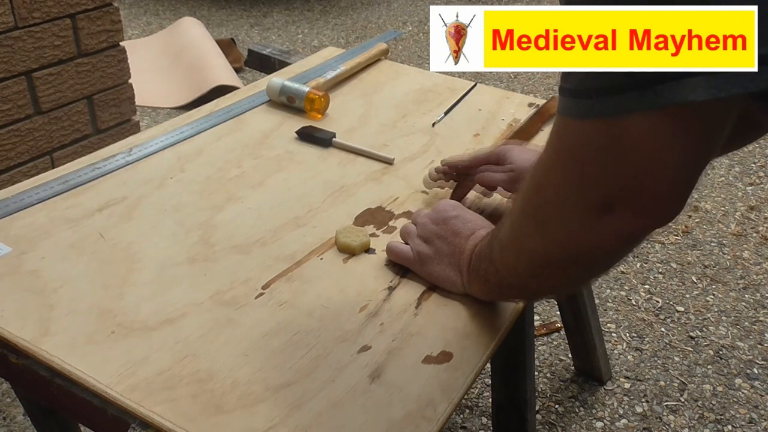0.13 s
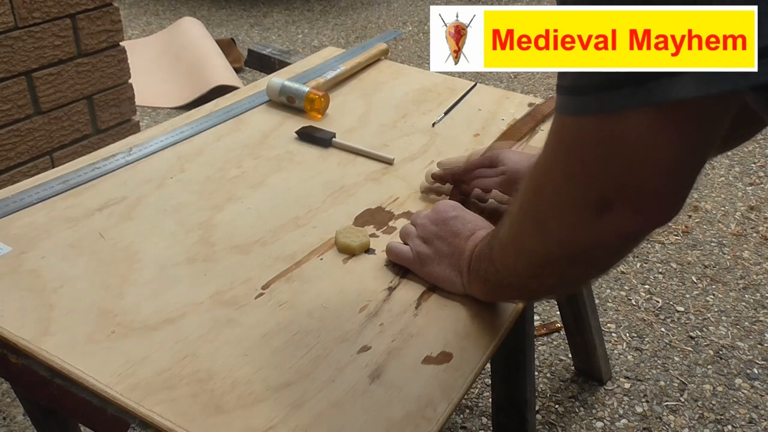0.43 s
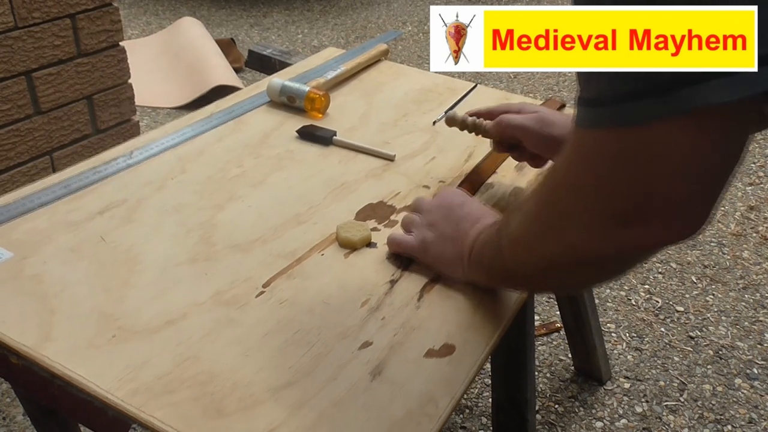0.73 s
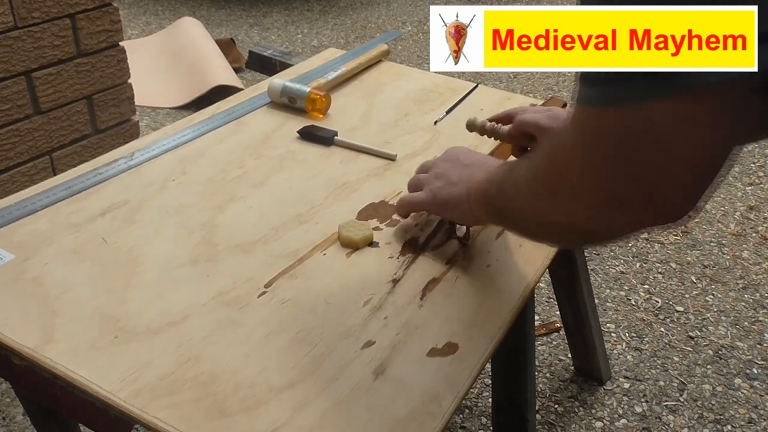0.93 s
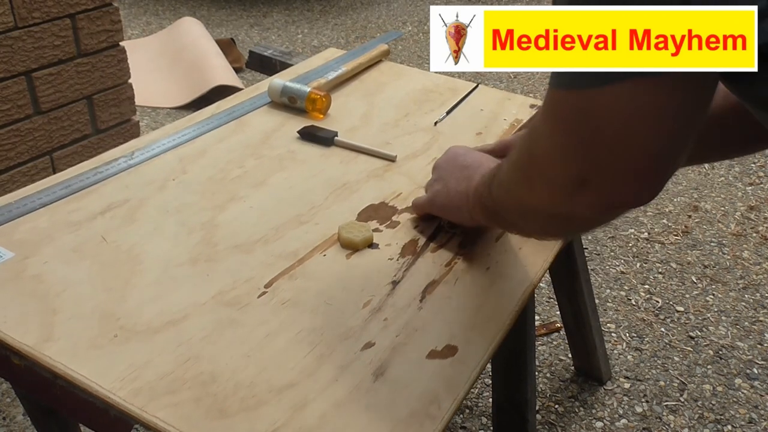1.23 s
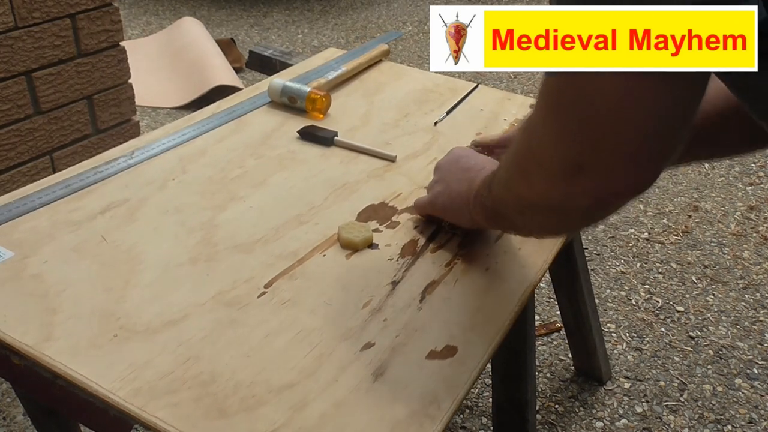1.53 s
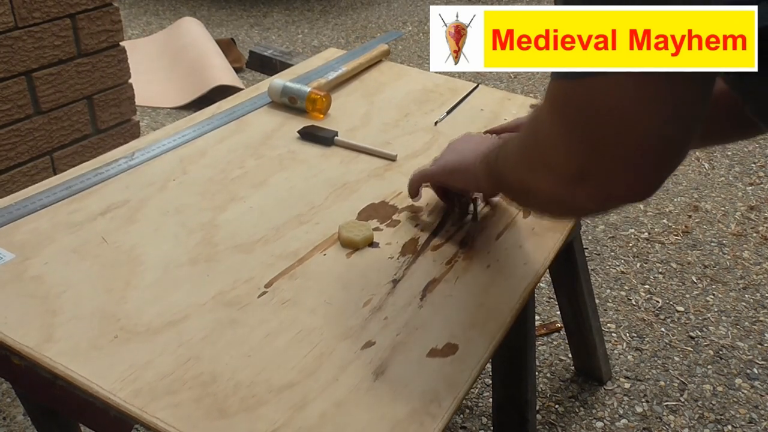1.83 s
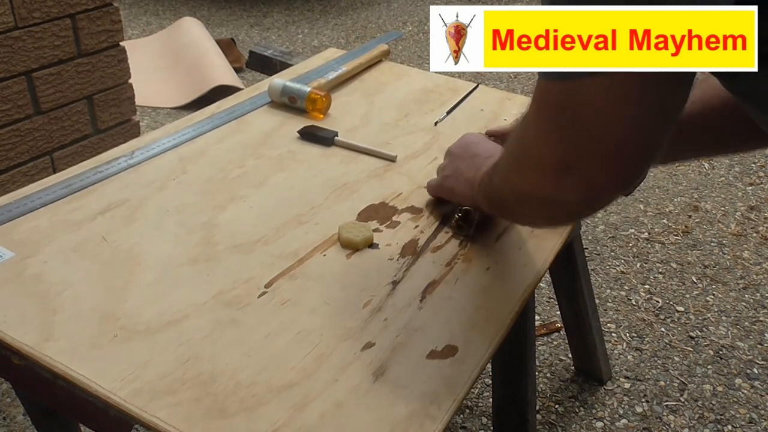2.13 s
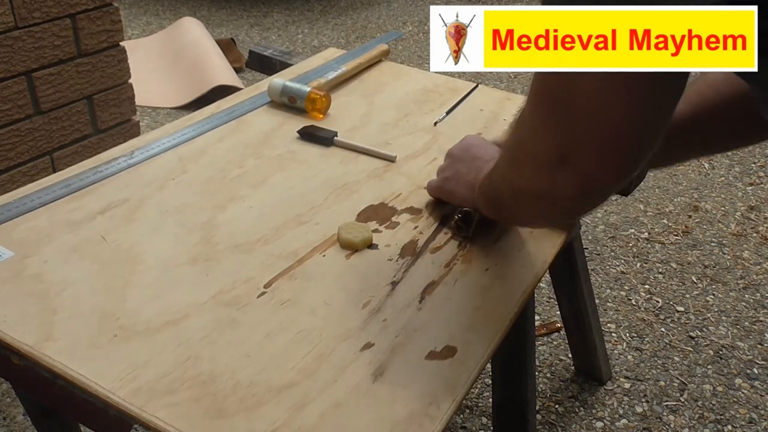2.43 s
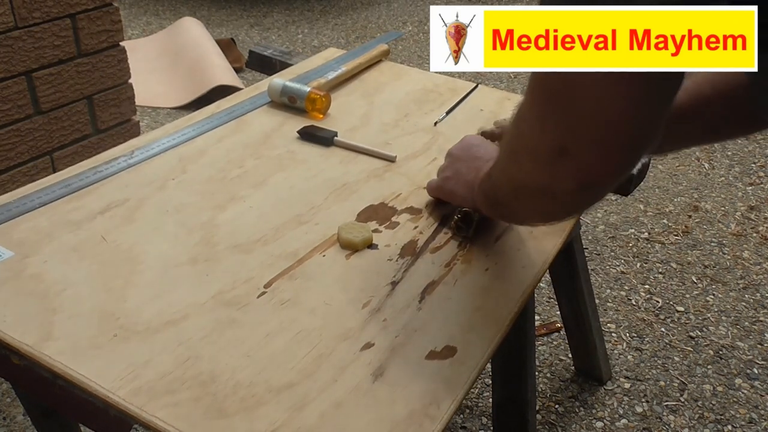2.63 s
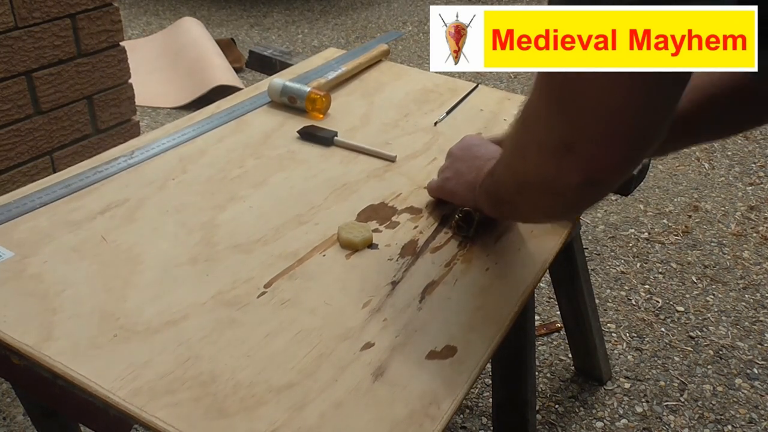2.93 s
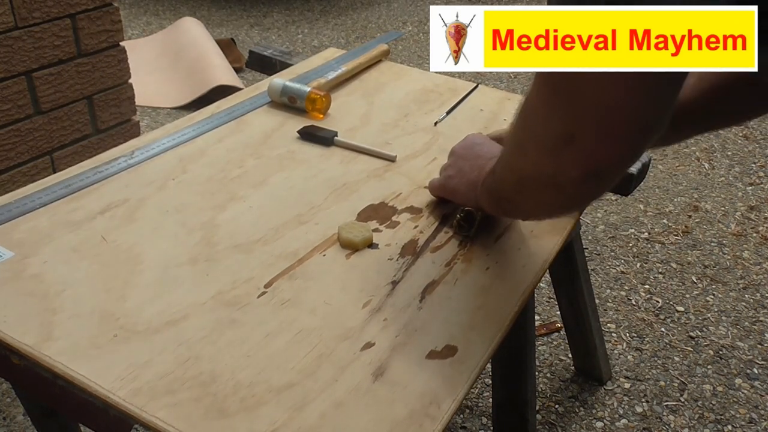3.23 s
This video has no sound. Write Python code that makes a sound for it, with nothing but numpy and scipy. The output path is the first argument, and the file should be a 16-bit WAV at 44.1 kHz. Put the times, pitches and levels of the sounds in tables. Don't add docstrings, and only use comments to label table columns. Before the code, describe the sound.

Hissing, shuddering rubs of wood on leather over a plywood bench, knocks and one loud crack

```python
import sys
import numpy as np
from scipy import signal
from scipy.io import wavfile
from scipy.ndimage import uniform_filter1d

SR = 44100
rng = np.random.default_rng(int(sys.argv[2]) if len(sys.argv) > 2 else 0)


def digitize_waveform(pressure):
    field = np.atleast_2d(pressure).T
    bounded = np.clip(field, -1, 1)
    quanta = np.round(bounded * 32767).astype(np.int16)
    wavfile.write(sys.argv[1], SR, quanta)


def ratio(d):
    e = np.asarray(d, float) / 20
    return 10 ** e


N = 149940

# frequency in Hz, level in dB.
AIR_HZ_DB = [(30, -28), (130, 1), (470, -6), (1500, -18.5), (3000, -32.5), (5000, -27.5), (11000, -31.5),
             (13500, -32.5), (16000, -61)]
INSECT_HZ_DB = [(7000, -32), (7600, -12.5), (9050, -0.5), (10000, -10.5), (10900, -32.5)]
AIR_DB, INSECT_DB, INSECT_CLICKS_PER_S = -36.5, -38.5, 4000

# time in seconds, peak in dB.
PIPS = [
    (0.953, -31),
    (1.024, -35),
    (1.1, -32),
    (1.172, -22.5),
    (1.287, -28),
    (1.382, -29),
    (1.524, -24),
]
PIP_HZ, PIP_S, PIP_DB = 862, .026, 1.5

# frequency in Hz, T60 in seconds.
YARD_T60_S = [(300, 0.16), (8000, 0.14)]
YARD_DB = -10

# frequency in Hz, left minus right in dB.
LEAN_HZ_DB = [(100, -1.7), (500, -0.5), (2000, 2), (6000, -0.5)]
BASS_CUT_HZ_DB = [(25, -74), (80, 4), (150, 1.5)]

RATTLE_HZ_DB = [(300, -4), (600, 3), (2200, -6), (2900, -28), (6000, -42)]
RATTLE_START_S, RATTLE_DB, RATTLE_T60_S = 2.045, -26, 0.14

# delay in seconds, level in dB.
CRACK_BOUNCES = [
    (.005, 1.5),
    (0.0229, -8.5),
    (.031, -18),
    (.047, -14.5),
]
# frequency in Hz, level in dB, T60 in seconds.
CRACK_MODES = [(34, -17, 0.063), (205, -13.5, 0.13), (360.4, -1.5, 0.091), (480, -4.5, 0.075),
               (640, 5.5, 0.054), (810, -8, 0.017), (1105, -1, 0.029), (1300, 1, 0.013),
               (1680, -4.5, 0.045)]
SNAP_HZ_DB = [(30, -12), (204, -15), (684, -3), (2100, -6), (3300, -15.5), (9710, -21), (16000, -32)]
# frequency in Hz, T60 in seconds.
SNAP_T60_S = [(100, 0.099), (1000, 0.14), (3000, 0.053), (6000, 0.073), (12000, 0.0071)]
CRACK_S, CRACK_DB, SNAP_DB = 2.0128, 2, 0

BENCH_MODES = [(159, -7.5, 0.14), (210.7, -6.5, 0.16), (252.6, 3.5, 0.098), (311.7, -1, 0.12),
               (396.6, -4, 0.12), (450.3, -1, 0.13), (539, -5.5, 0.039), (610.3, 2, 0.066),
               (658, -10.5, 0.079), (1050, -17, 0.28)]
TOOL_MODES = [(620, -3, .04), (1050, -2, .04), (1340, 0, .04), (1900, -4, .035)]
# time in seconds, peak in dB, hardness 0 to 1.
KNOCKS = [
    (0.47, -16.5, 0.27),
    (0.674, -18, 1),
    (0.754, -21, 0.24),
    (0.854, -18.5, 0.17),
    (1.126, -20.5, 0.43),
    (1.22, -19.5, 0.42),
    (1.597, -20, 0.6),
    (1.904, -14, 0.24),
]
# time in seconds, peak in dB, pitch in Hz.
TICKS = [
    (.7945, -33, 3500),
    (.8325, -29, 4150),
    (1.1423, -27, 2600),
    (1.8125, -35, 3500),
    (1.9036, -21, 3600),
    (2.2548, -18.5, 5500),
    (2.3436, -21, 7300),
    (2.345, -24, 3600),
]

# start in seconds, length in seconds, level in dB, peak as share of length.
SKID = (.5525, .085, -22, .1)
SKID_HZ_DB = [(120, -44), (200, -10), (456, -2.5), (791, -13), (1160, -8), (2130, -24), (2380, -31),
              (5730, -18), (16000, -59)]
# frequency in Hz, width in Hz, level in dB.
SKID_RINGS = [(1240, 400, 0), (1920, 120, -4)]
# start in seconds, length in seconds, level in dB, pitch in Hz, width in Hz.
SQUEAKS = [(.909, .014, -43, 13300, 900), (.92, .022, -49, 12800, 500), (.911, .012, -45, 11600, 700),
           (.91, .03, -51, 15300, 500), (.909, .03, -43, 6300, 500), (.909, .02, -43, 4700, 700),
           (.95, .024, -39, 6150, 250), (.954, .012, -41, 11500, 600), (.956, .008, -45, 12800, 800),
           (.955, .03, -51, 15200, 700), (.974, .018, -38, 4600, 1500), (1.0, .012, -42, 3900, 900)]

# time in seconds, peak in dB, pitch in Hz.
JOLTS = [(0.149, -21.5, 483), (0.286, -18.5, 400), (0.468, -15.5, 583), (0.499, -19, 378),
         (0.521, -19, 363), (0.553, -15, 1384), (0.673, -16.5, 1320), (0.856, -11.5, 628),
         (0.903, -15.5, 636), (1.128, -14, 598), (1.136, -14.5, 466), (1.171, -17, 870), (1.221, -8.5, 632),
         (1.466, -14.5, 554), (2.151, -15, 627), (2.441, -26, 470), (2.527, -16, 387), (2.649, -17, 280),
         (2.677, -9, 677), (2.729, -29, 450), (2.762, -24, 243), (2.889, -14, 533), (2.988, -10, 274),
         (3.019, -17, 274), (3.132, -7, 624), (3.154, -10, 307), (3.183, -7.5, 276), (3.257, -6.5, 313),
         (3.268, -5, 445), (3.287, -8, 264),
         (.034, -24, 1060), (.221, -25, 1040), (.443, -25, 1150), (.479, -14, 334), (.753, -18, 697),
           (.777, -21, 413), (1.174, -19, 1290), (1.226, -11.5, 560), (1.5973, -8.5, 304),
           (1.9054, -6.5, 401), (1.929, -11.5, 333), (2.99, -21, 994), (3.005, -18, 660)]
JOLT_RISE_S, JOLT_T60_S, JOLT_T60_CYCLES, JOLT_DB = 0.0017, 0.025, 9.4, -2.5

# start in seconds, length in seconds, level in dB.
DRONES = [
    (1.378, .12, -27),
    (1.655, .11, -23),
    (1.24, .035, -26),
    (2.515, .075, -24),
]
DRONE_HZ = 209

# start in seconds, length in seconds, hiss in dB,
# shudder in dB.
PUSHES = [
    (.035, 0.074, -41.5, -30.5),
    (.225, 0.1, -39, -27.5),
    (.465, 0.089, -39, -24.5),
    (1.375, 0.12, -36, -26),
    (1.645, 0.11, -37.5, -29.5),
    (2.39, 0.11, -34, -27),
    (2.605, 0.11, -34, -21.5),
    (2.84, 0.11, -33, -17.5),
    (3.09, 0.12, -34, -19),
    (3.35, 0.088, -34.5, -21.5),
]
# start in seconds, length in seconds, hiss in dB, shudder in dB.
PULLS = [(.125, 0.071, -37, -28), (.34, 0.097, -35.5, -28), (.655, 0.058, -40, -27),
         (1.12, 0.11, -36, -25.5), (1.215, 0.1, -46, -28), (1.515, 0.13, -33.5, -22.5),
         (2.275, 0.095, -35.5, -22.5), (2.5, 0.097, -33, -22), (2.73, 0.095, -32, -20),
         (2.97, 0.099, -32, -19), (3.225, 0.11, -32, -19)]
# start in seconds, length in seconds, hiss in dB, shudder in dB.
SHIFTS = [
    (-.05, 0.073, -44.5, -34),
    (.745, 0.04, -78, -28),
    (.795, 0.051, -42.5, -31),
    (.86, 0.062, -44.5, -29),
    (.9, 0.13, -38.5, -30.5),
    (1.0, 0.16, -52.5, -37.5),
    (1.92, 0.27, -45, -42),
    (2.05, 0.098, -63, -29),
    (2.13, 0.074, -67, -26),
]
HISS_HZ_DB = [(880, -5), (1500, 0), (2080, -1.5), (2690, -11.5), (4730, -2.5), (7240, -11), (9280, -25),
              (10100, -21.5), (16000, -36)]
SHUDDER_HZ_DB = [(24, -106), (40, -51), (205, 7), (342, -3.5), (673, -1.5), (780, -6), (1050, -6),
                 (1230, -9.5), (3200, -55.5), (4160, -86), (7040, -120)]
PUSH_PEAK, PULL_PEAK, SHIFT_PEAK = 0.5, 0.39, 0.45
HISS_EDGE, SHUDDER_EDGE, SHUDDER_LAG_S = 0.56, 0.64, 0.0051
SLIPS_PER_S, SLIP_SPREAD_DB = 1600, 3
GRIT_PER_S, GRIT_SPREAD_DB, RING_DB = 6000, 0.5, 1.5


def evened(x):
    return x / np.sqrt(np.mean(x ** 2) + 1e-20)


def read(points, hz):
    f, value = np.transpose(points)
    return np.interp(np.log(hz + 1), np.log(f + 1), value)


def add(mix, s, sound):
    part = mix[round(s * SR):][:len(sound)]
    part += sound[:len(part)]


def colour(x, points):
    db = read(points, np.abs(np.fft.fftfreq(8192, 1 / SR)))
    log = np.log(ratio(np.maximum(db, -100)))
    taps = np.fft.ifft(np.exp(log - 1j * signal.hilbert(log).imag)).real[:2048]
    taps = taps.reshape((1,) * (x.ndim - 1) + (-1,))
    return signal.oaconvolve(x, taps, axes=-1)[..., :x.shape[-1]]


def bands(x, peaks):
    return sum(ratio(db) * signal.lfilter(*signal.iirpeak(hz, hz / width, SR), x) for hz, width, db in peaks)


def narrow(x, hz, width):
    peak = [(hz, width, 0)]
    return evened(bands(bands(x, peak), peak))


def faded(x, t60_points, size):
    hz, t, z = signal.stft(x, SR, nperseg=size)
    return signal.istft(z * ratio(-60 * t / read(t60_points, hz)[:, None]), SR, nperseg=size)[1]


def rings(modes, spread=0):
    t, wobble = np.arange(SR // 4) / SR, rng.standard_normal((len(modes), 3))
    out = np.zeros(len(t))
    for k, ((hz, db, t60), w) in enumerate(zip(modes, wobble)):
        fade = ratio(db + 60 * spread * w[0] - 60 * t / t60)
        out += fade * np.sin(2 * np.pi * hz * (1 + spread * w[1]) * t + np.pi * k + 20 * spread * w[2])
    return np.minimum(t / 0.00012, 1) * out


def grains(per_s, spread_db, shape=N):
    size = ratio(spread_db * np.minimum(rng.exponential(1, shape), 4)) * rng.choice([-1., 1.], shape)
    return evened(size * (rng.random(shape) < per_s / SR))


def arch(start, length, peak, edge):
    u = (np.arange(N) / SR - start) / length
    bend = np.log(.5) / np.log(np.clip(peak, .05, .9))
    speed, on = np.zeros(N), (u > 0) & (u < 1)
    speed[on] = np.sin(np.pi * u[on] ** bend) ** edge
    return speed


def patchy(x, size, wide, long, patchy_db):
    overlap = size * 3 // 4
    z = signal.stft(x, nperseg=size, noverlap=overlap)[2]
    field = uniform_filter1d(rng.standard_normal(z.shape[::-1]).T, wide, 0)
    field = evened(uniform_filter1d(field, long, 1))
    return evened(signal.istft(z * ratio(patchy_db * field), nperseg=size, noverlap=overlap)[1][:N])


def outdoors():
    air = colour(rng.standard_normal((3, N)), AIR_HZ_DB)
    air = evened(air[:1] + colour(air[1:], [(60, 1.5), (150, -7.5), (1000, -0.5), (12000, -1.0)]))
    clicks = grains(INSECT_CLICKS_PER_S, 0.96, (3, N))
    clicks = colour(clicks[1:] + 1.12 * clicks[:1], INSECT_HZ_DB)
    side_db = np.array([[-.6], [1.8]])
    return ratio(AIR_DB) * air + ratio(INSECT_DB + side_db) * evened(clicks)


def frog():
    out, t = np.zeros(N), np.arange(0, PIP_S, 1 / SR)
    pip = np.sin(np.pi * (t / PIP_S) ** 0.7) ** 2 * np.sin(2 * np.pi * PIP_HZ * t)
    for s, db in PIPS:
        add(out, s - .004, ratio(db + PIP_DB) * pip)
    return out


def yard(x):
    taps = np.zeros((2, SR // 4))
    at = np.arange(60, SR // 4 - 20, 20) + rng.integers(0, 20, (2, (SR // 4 - 61) // 20))
    np.put_along_axis(taps, at, rng.choice([-1., 1.], at.shape), 1)
    tail = colour(faded(taps, YARD_T60_S, 256), [(150, -14), (1500, 2.5)])
    return signal.oaconvolve(x[None], tail / np.linalg.norm(tail[0]), axes=1)[:, :N]


def rattle():
    t = np.maximum(np.arange(N) / SR - RATTLE_START_S, 0)
    fade = np.minimum(t / .008, 1) * ratio(RATTLE_DB - 60 * t / RATTLE_T60_S)
    return fade * evened(colour(grains(2500, 3.6), RATTLE_HZ_DB))


def crack():
    out = np.zeros(N)
    snap = faded(colour(rng.standard_normal(SR // 2), SNAP_HZ_DB), SNAP_T60_S, 128)
    add(out, CRACK_S, ratio(CRACK_DB + SNAP_DB) * snap / np.std(snap[:400]) / 2)
    for delay, db in [(0.00037, 0), *CRACK_BOUNCES]:
        ring = rings(CRACK_MODES, spread=0.031)
        add(out, CRACK_S + delay, ratio(CRACK_DB + db) * ring / abs(ring).max())
    return out


def knocks():
    out, t = np.zeros(N), np.arange(1500) / SR
    puff_hz_db = [(300, -36), (900, 6), (2500, -13.5), (5500, -21), (9000, -66)]
    for s, db, hard in KNOCKS:
        hard = np.clip(hard, 0, 1)
        bench, tool = rings(BENCH_MODES[1:9], spread=0.047), rings(TOOL_MODES, spread=0.034)
        blow = (1 - hard) * bench / abs(bench).max() + hard * tool / abs(tool).max()
        add(out, s, ratio(db + 1.0) * blow)
        puff = evened(colour(rng.standard_normal(len(t)), puff_hz_db))
        add(out, s, ratio(db - 8.5 - 60 * t / 0.076) * (0.52 + hard) * puff)
    for s, db, hz in TICKS:
        tick = narrow(rng.standard_normal(len(t)), hz, 3000)
        add(out, s, ratio(db - 7.0 - 60 * t / 0.01) * tick)
    return out


def skid():
    start, length, db, peak = SKID
    grit = patchy(grains(2200, 3), 256, 4, 6, 3)
    scrape = evened(colour(grit, SKID_HZ_DB)) + 0.7 * evened(bands(grit, SKID_RINGS))
    out = ratio(db) * arch(start, length, peak, 0.57) * scrape
    fine = grains(4040, 3.3)
    for s, span, level_db, hz, width in SQUEAKS:
        out += ratio(level_db) * arch(s, span, 0.26, 0.62) * narrow(fine, hz, width)
    return out


def jolts():
    out, t = np.zeros(N), np.arange(3000) / SR
    for s, db, hz in JOLTS:
        t60 = JOLT_T60_S + JOLT_T60_CYCLES / hz
        fade = np.minimum(t / JOLT_RISE_S, 1) * ratio(db + JOLT_DB - 60 * t / t60)
        overtone = 0.37 * ratio(-60 * t / 0.034) * np.sin(2 * np.pi * 1.62 * hz * t)
        add(out, s - .001, fade * (np.sin(2 * np.pi * hz * t) + overtone))
    return out


def strokes():
    hiss, shake, lean = np.zeros(N), np.zeros(N), np.zeros(N)
    for rows, peak in ((PUSHES, PUSH_PEAK), (PULLS, PULL_PEAK), (SHIFTS, SHIFT_PEAK)):
        for start, length, hiss_db, shudder_db in rows:
            hiss += ratio(hiss_db + 1.0) * arch(start, length, peak, HISS_EDGE)
            shake += ratio(shudder_db + 1.5) * arch(start + SHUDDER_LAG_S, length, peak, SHUDDER_EDGE)
    for start, length, db in DRONES:
        lean += ratio(db) * arch(start, length, SHIFT_PEAK, 0.95)

    grit = patchy(colour(grains(GRIT_PER_S, GRIT_SPREAD_DB), HISS_HZ_DB), 256, 4, 16, 3)
    clumps = ratio(2.3 * evened(uniform_filter1d(rng.standard_normal(N), 250)))
    slips = patchy(clumps * grains(SLIPS_PER_S, SLIP_SPREAD_DB), 1024, 2, 8, 2.5)
    broad = evened(colour(slips, SHUDDER_HZ_DB))
    body = rings(BENCH_MODES)
    ring = signal.oaconvolve(slips * shake, body / np.linalg.norm(body))[:N]

    wander = uniform_filter1d(clumps, 500)
    drone_hz = DRONE_HZ * (.85 + .15 * wander[::-1])
    drone = lean * wander * np.sin(2 * np.pi * np.cumsum(drone_hz) / SR)
    return drone + hiss * grit + 0.51 * (shake * broad + ratio(RING_DB) * ring)


def scene():
    rubbing = strokes() + skid() + knocks() + jolts() + rattle()
    near = colour(rubbing, BASS_CUT_HZ_DB) + crack()
    sides = [colour(near, [(hz, side * db / 2) for hz, db in LEAN_HZ_DB]) for side in (1, -1)]
    far_frog = frog() * ratio(np.array([[1.5], [-1.5]]))
    return np.array(sides) + ratio(YARD_DB) * yard(near) + far_frog + outdoors()


def top_cut(x):
    return signal.sosfilt(signal.butter(12, 16210, fs=SR, output="sos"), x)


def record(dry):
    limited = colour(np.clip(dry, -1, 1), [(15600, 0), (16400, -45)])
    return top_cut(limited)


dry = scene()
out = record(dry)
digitize_waveform(out)
```